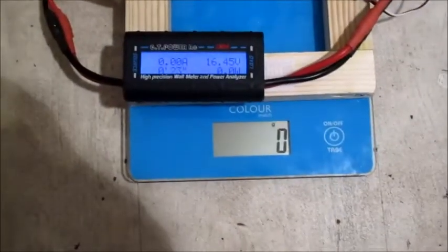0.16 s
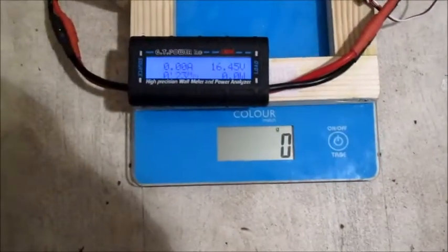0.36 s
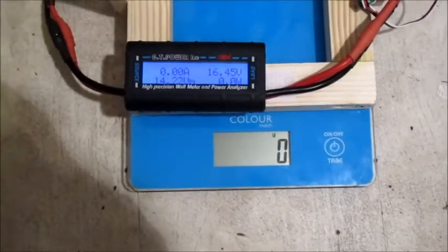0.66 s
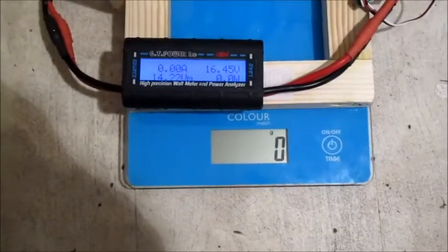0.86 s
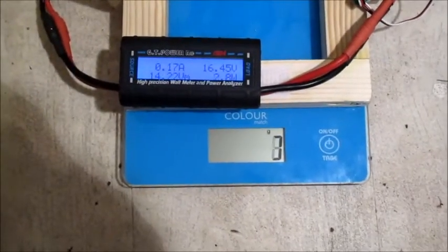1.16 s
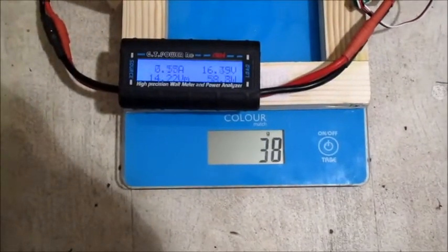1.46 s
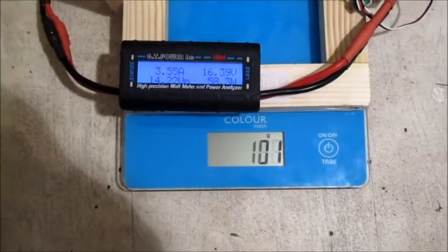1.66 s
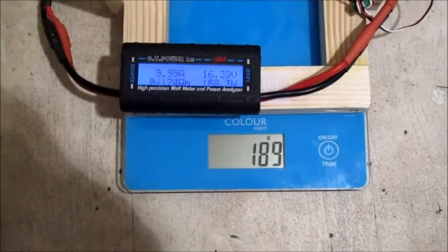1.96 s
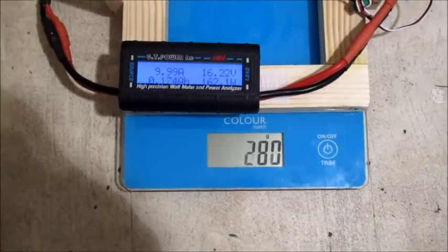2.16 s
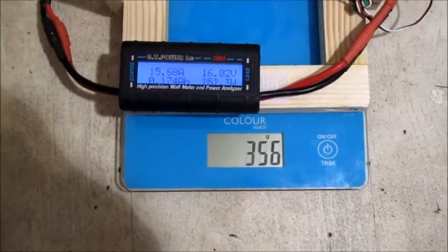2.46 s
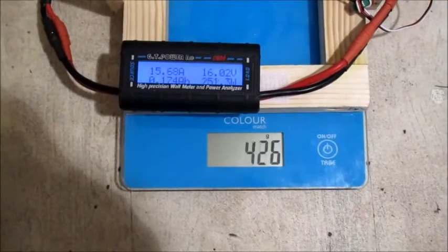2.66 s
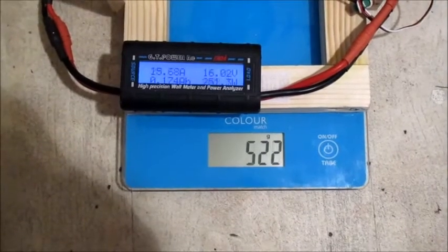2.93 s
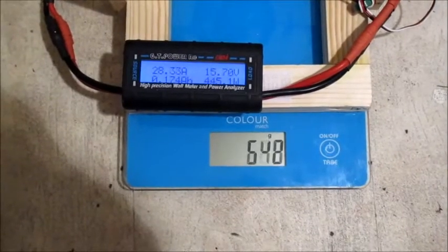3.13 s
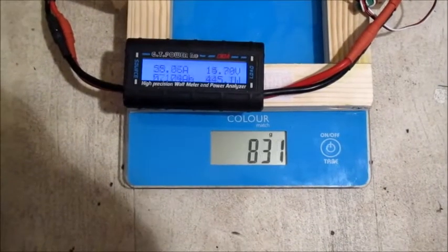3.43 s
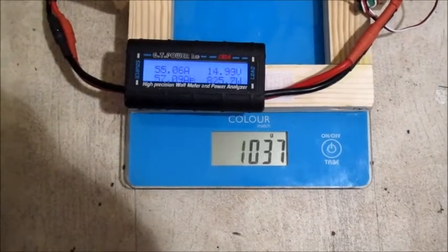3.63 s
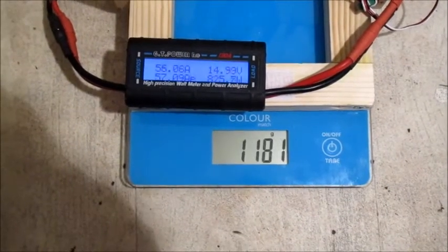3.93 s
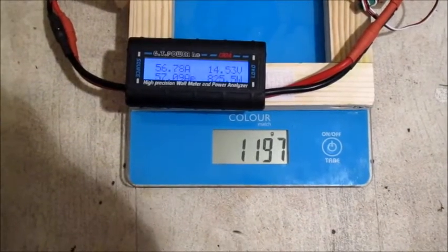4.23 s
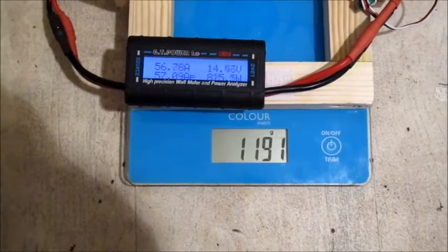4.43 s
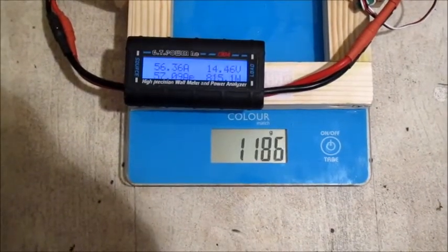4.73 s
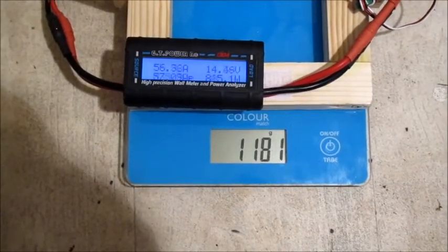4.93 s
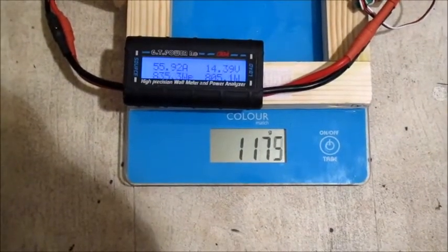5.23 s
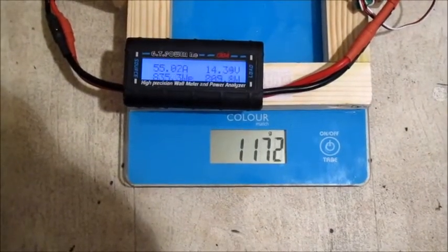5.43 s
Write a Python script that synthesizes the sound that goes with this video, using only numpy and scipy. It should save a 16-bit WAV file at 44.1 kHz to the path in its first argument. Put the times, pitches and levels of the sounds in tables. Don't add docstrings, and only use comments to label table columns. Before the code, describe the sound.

A small motor fan chirps into motion, climbs in pitch with strong hissing airflow, holds a piercing steady whine, and finally starts slowing.

```python
import sys
import numpy as np
from scipy import signal
from scipy.io import wavfile
from scipy.ndimage import uniform_filter1d

SR = 44100
rng = np.random.default_rng(int(sys.argv[2]) if len(sys.argv) > 2 else 0)


def materialize(psi):
    bounded = np.clip(np.atleast_2d(psi).T, -1, 1)
    quanta = np.round(bounded * 32767).astype(np.int16)
    wavfile.write(sys.argv[1], SR, quanta)


def attenuation_scalar(level_db):
    decades = np.asarray(level_db, float) / 20
    return 10 ** decades


N = 246519
T = np.arange(N) / SR
HZ = np.fft.rfftfreq(1024, 1 / SR)[:, None]
FRAMES = np.arange(N // 256 + 5) * 256 / SR


def evened(x):
    return x / np.sqrt(np.mean(x ** 2) + 1e-20)


def read(points, hz):
    f, value = np.transpose(points)
    return np.interp(np.log(hz + 1), np.log(f + 1), value)


def drift(fastest_hz):
    waves = 0
    for f in np.geomspace(.5, fastest_hz, 16):
        waves = waves + np.sin(2 * np.pi * (f * T + rng.random())) / np.sqrt(f)
    return evened(waves)


def noise(colour_db, patchy_db):
    real, imaginary, patches = rng.standard_normal((len(FRAMES), 513, 3)).T
    patches = uniform_filter1d(patches, 10, 0)
    patches = evened(uniform_filter1d(patches, 10, 1))
    gain = attenuation_scalar(colour_db + 0 * patches)
    gain = gain / np.sqrt((gain ** 2).mean(0))
    spectra = (real + 1j * imaginary) * gain * attenuation_scalar(patchy_db * patches)
    return evened(signal.istft(spectra, nperseg=1024, noverlap=768)[1][:N])


def echoes(hz, depth, longest_s):
    delay, turn = rng.random((12, 2)).T
    grid = np.arange(0, SR / 2, 2.)
    comb = np.exp(2j * np.pi * (grid[:, None] * delay * longest_s + turn)).sum(1) / np.sqrt(12)
    return (1 + depth * np.interp(hz, grid, comb, right=0)) / np.sqrt(1 + depth ** 2)


def tone(rows):
    s, hz, db = np.transpose(rows)
    level_db = np.interp(T, s, db, left=-200, right=-200)
    turns = np.cumsum(np.interp(T, s, hz)) / SR
    return np.sqrt(2) * attenuation_scalar(level_db) * np.sin(2 * np.pi * turns)


# time in seconds, shaft speed in Hz, then levels in dB
FAN_RUN = [
    [(0.9, 139.9, -55, -55, -61, -44), (0.924, 159.7, -55, -62, -38, -43),
     (0.978, 193.7, -33.5, -36, -30, -46), (1.126, 253.4, -28, -45, -24, -36),
     (1.168, 259.7, -26, -54, -40, -49), (1.196, 272.8, -27, -38, -27, -38),
     (1.286, 306.2, -27.5, -41, -24, -27), (1.316, 320.6, -28, -45, -23.5, -48),
     (1.368, 343.7, -24.5, -31, -22, -34), (1.416, 366.1, -33, -43, -23.5, -27),
     (1.508, 419.7, -27.5, -29, -17.5, -32), (1.566, 430.5, -30, -33, -42, -18.5),
     (1.668, 448.4, -34, -21.5, -25.5, -25), (1.77, 489.1, -28, -51, -17.5, -28),
     (1.816, 502.9, -25, -36, -16.5, -34), (2.0, 526.7, -27.5, -44, -15, -38)],
    [(2.01, 530.9, -28, -39, -19.5, -37), (2.082, 544.8, -21, -47, -14, -30),
     (2.204, 570.2, -25, -25, -23, -33), (2.24, 582.4, -26, -28, -10.5, -27),
     (2.27, 587.9, -21.5, -26, -28, -39), (2.354, 612.6, -34.5, -32.5, -13, -27),
     (2.554, 656.7, -37, -42, -6, -46), (2.642, 685.1, -29, -29, -19.5, -37),
     (2.766, 735.4, -20.5, -31, -11, -29), (2.81, 751.6, -21, -45, -25, -44),
     (2.826, 762.5, -15, -31, -17.5, -30), (3.086, 857.6, -14.5, -24, -12, -30),
     (3.112, 864.3, -13.5, -32, -30, -27), (3.134, 875.2, -20, -48, -14, -29),
     (3.152, 884.2, -28, -26, -14, -26), (3.222, 911.7, -19.5, -39, -14, -17),
     (3.284, 934.0, -16.5, -27.5, -11.5, -25), (3.33, 940.2, -15, -35, -18, -18)],
    [(3.34, 939.9, -16.5, -33, -19, -20), (3.372, 939.7, -16, -33, -17, -26),
     (3.38, 939.6, -16.5, -32, -18, -21), (3.538, 938.6, -15.5, -32, -18, -21.5),
     (3.556, 938.5, -16, -40, -21, -21), (3.588, 938.2, -15.5, -33, -16, -21),
     (3.616, 938.2, -16, -34, -15, -18), (3.742, 935.7, -17, -31, -17, -20.5),
     (3.782, 937.7, -17.5, -28, -13, -23), (3.796, 935.6, -17, -37, -13, -17.5),
     (3.844, 934.9, -16.5, -30.5, -13, -20.5), (4.004, 935.3, -15, -32, -12, -21.5),
     (4.084, 933.0, -16, -28, -12, -25), (4.112, 933.0, -17, -34, -12, -23),
     (4.126, 932.9, -15.5, -27.5, -12, -22), (4.402, 931.1, -17, -28, -16, -26),
     (4.412, 931.1, -17, -27, -19, -31), (4.454, 930.6, -15.5, -25.5, -10.5, -26),
     (4.508, 931.1, -17.5, -26, -16, -29), (4.63, 929.7, -14.5, -27, -16, -26),
     (4.74, 928.9, -17, -27, -9.5, -24), (5.0, 927.2, -16.5, -27.5, -15.5, -25.5)],
    [(5.3, 929.3, -16.5, -26, -12.5, -35), (5.446, 928.2, -18, -25.5, -12, -28),
     (5.478, 921.1, -18, -28, -15.5, -21), (5.52, 890.1, -28, -41, -16.5, -25),
     (5.546, 866.4, -20.5, -36, -21, -33), (5.558, 850.1, -13, -23, -13, -26),
     (5.59, 814.6, -18, -30, -17, -30)],
]


def strong_tones(speed, turns, levels_db, sweeping):
    out = np.zeros(N)
    for k, db, depth in zip((1, 2, 5, 7), levels_db, (.1, .3, .35, .4)):
        wave = echoes(k * speed, depth * sweeping, .04) * np.exp(2j * np.pi * k * turns)
        out += (attenuation_scalar(db + 0.34 * drift(25.)) * wave).real
    return out


WEAK_SPEEDS = [230, 400, 560, 720, 860, 927, 940]
# multiple of the shaft speed, then level in dB at each of WEAK_SPEEDS.
WEAK_TONES = [(3, -39, -38, -40, -31.5, -35, -29, -29.5), (4, -35, -35, -35, -31, -29, -30.5, -21.5),
              (6, -36, -32, -37, -31, -34, -31.5, -38), (8, -34, -24, -28, -37, -19, -34, -27),
              (9, -34, -30, -44, -30, -38, -40, -36), (10, -37, -24.5, -35, -34, -30, -29.5, -28.5),
              (11, -33, -36, -29, -31, -31, -26, -27.5), (12, -36, -43, -44, -48, -46, -40, -35),
              (13, -42, -34, -48, -46, -43, -49, -49), (14, -46, -46, -47, -48, -47, -48, -43),
              (15, -44, -37, -28, -32, -43, -44, -44), (16, -46, -44, -50, -50, -52, -52, -56),
              (18, -49, -48, -52, -55, -60, -70, -70)]


def weak_tones(speed, turns, sweeping):
    hiss_s, hiss_db = np.transpose(np.concatenate(AIR_LEVELS))[:2]
    duck_db = np.interp(T, hiss_s, hiss_db) + 19
    out = np.zeros(N)
    for k, *levels in WEAK_TONES:
        db = np.interp(speed, WEAK_SPEEDS, levels) + duck_db + 1.1 * drift(18.0)
        wave = echoes(k * speed, .9 * sweeping, .02) * np.exp(2j * np.pi * (k * turns + rng.random()))
        out += (attenuation_scalar(db) * wave).real
    return out


# shaft multiple, start and end in seconds, level in dB.
SWITCHING_TONES = [
    (3, 0.81, 1.5, -42),
    (4, .88, 1.45, -52),
    (5, .92, 1.1, -54),
    (2, 1.1, 1.65, -50),
]


def switching_tones(turns):
    out = np.zeros(N)
    for k, start, stop, db in SWITCHING_TONES:
        gate = np.clip(np.minimum(T - start, stop - T) / .015, 0, 1)
        out += gate * attenuation_scalar(db + 2.5 * drift(15.)) * np.cos(2 * np.pi * (16000 * T - k * turns))
    return out


def rotor():
    s, *columns = np.transpose(np.concatenate(FAN_RUN))
    speed, *levels_db = (np.interp(T, s, c, left=.8 * c[0]) for c in columns)
    turns = np.cumsum(speed * (1 + 0.00031 * drift(30.4))) / SR
    sweeping = np.clip((918 - speed) / 30, .12, 1)
    out = strong_tones(speed, turns, levels_db, sweeping) + weak_tones(speed, turns, sweeping)
    out *= np.clip((T - s[0]) / .03, 0, 1)
    return np.sqrt(2) * (out + switching_tones(turns))


# pitch in Hz, width in Hz, lift in dB.
DUCT_RESONANCES = [(3204, 310, 10.5), (4030, 410, 1.5), (6830, 410, 1), (8380, 400, 4), (10700, 460, -0.5)]


def duct_db(hz):
    return sum(db / (1 + (2 * (hz - f) / width) ** 2) for f, width, db in DUCT_RESONANCES)


# time in seconds, then levels in dB of hiss, midrange rush, buffeting.
AIR_LEVELS = [
    [(0.8, -76, -54, -56), (0.83, -60, -50, -55), (0.902, -32.5, -47, -50), (1.004, -18.5, -21, -30),
     (1.066, -19.5, -15, -38), (1.1, -18, -24, -32)],
    [(1.12, -17.5, -23, -31), (1.21, -15.5, -20, -35), (1.26, -16, -20, -29), (1.33, -16.5, -19, -35),
     (1.44, -17, -20.5, -31.5), (1.83, -18.5, -22.5, -29.5), (1.92, -19, -23, -29.5), (1.95, -20, -23, -31),
     (2.12, -19, -22, -26.5), (2.19, -19, -23.5, -32), (2.26, -18, -20, -27.5), (2.34, -19.5, -24.5, -32),
     (2.55, -23, -23.5, -35), (2.61, -20.5, -25, -30.5), (2.87, -18.5, -22.5, -27.5),
     (2.96, -20.5, -20, -31), (3.05, -19, -21, -26.5), (3.07, -20.5, -20, -26.5), (3.19, -19, -19.5, -22),
     (3.24, -18.5, -16.5, -29), (3.27, -19.5, -18, -27.5), (3.34, -18.5, -20.5, -23),
     (3.45, -18.5, -17.5, -28.5), (3.65, -18.5, -19.5, -22.5), (3.7, -20, -18, -31),
     (3.81, -20, -18.5, -25.5), (3.85, -19.5, -18, -29), (4.22, -19, -18.5, -26.5), (4.24, -19, -22, -25),
     (4.28, -20, -20.5, -27), (4.44, -19, -18, -28), (4.47, -18, -19, -32), (4.54, -19, -19.5, -24.5),
     (4.67, -19.5, -20, -28.5), (4.82, -19, -19.5, -26), (4.98, -19.5, -21.5, -28.5),
     (5.02, -19.5, -18.5, -25.5), (5.2, -20, -20, -29), (5.28, -20.5, -18, -26),
     (5.33, -19.5, -18.5, -26.5), (5.4, -19, -19, -33), (5.45, -19.5, -18, -23.5), (5.51, -20, -21, -27),
     (5.59, -20, -21, -26)],
]
# pitch in Hz, level in dB per Hz.
SLOW_HISS = [(1500, -24), (2500, -3.5), (4000, -6), (5000, -8), (6500, -2), (7800, -10), (10000, -8),
             (12000, -14), (15500, -23)]
FAST_HISS = [(1500, -26), (2500, -12), (4000, -3.5), (5000, -4.5), (6500, 0.5), (7800, -5.5), (10000, -6),
             (12000, -10.5), (15500, -18)]
RUSH_COLOUR = [(150, -8.5), (300, 0.5), (600, -2.5), (1000, -0.5), (1800, -1), (2600, 1), (4000, -10.5)]
# pitch in Hz, level in dB per Hz.
BUFFET_COLOUR = [(20, -42), (40, -21), (70, -0.5), (130, 2.5), (210, 1), (320, -11), (600, -42),
                 (1200, -45)]


def air():
    s, speed = np.transpose(np.concatenate(FAN_RUN))[:2]
    fast = np.clip(np.interp(FRAMES, s, speed) / 940, 0, 1)
    hiss_colour = (1 - fast) * read(SLOW_HISS, HZ) + fast * read(FAST_HISS, HZ)
    hiss = noise(hiss_colour + duct_db(HZ), 0.96)
    rush = noise(read(RUSH_COLOUR, HZ), 0.97)
    buffet = noise(read(BUFFET_COLOUR, HZ / fast ** 0.68), 0.61)
    at, *levels = np.transpose(np.concatenate(AIR_LEVELS))
    hiss_db, rush_db, buffet_db = (np.interp(T, at, c, left=-120) for c in levels)
    crackle = attenuation_scalar(0.95 * evened(uniform_filter1d(rng.standard_normal(N), 60)))
    out = attenuation_scalar(hiss_db + 0.5) * hiss * crackle
    out += attenuation_scalar(rush_db - 6.5) * rush
    return out + attenuation_scalar(buffet_db + 2.0) * buffet


# time in seconds, level in dB, rise in seconds,
# time to fall by 60 dB in seconds, share of the higher ring in dB.
MOTOR_KICKS = [
    (.808, -37, .001, .06, -10),
    (.817, -17.5, 0.00092, 0.053, -11),
    (0.832, -12.5, 0.0013, 0.06, -14),
    (.836, -8.5, .007, 0.082, -21),
    (0.869, -27, .004, 0.22, -4),
    (.903, -12.5, 0.0044, 0.091, -14),
    (.938, -25, 0.0072, .06, 9),
    (.955, -23, .004, .08, -10),
    (1.093, -7, .008, 0.063, -23),
]
# pitch in Hz, level in dB.
RATTLE_COLOUR = [(150, -20), (300, -3), (500, 0.5), (900, 2), (1900, -2.5), (3200, -9), (5000, -14),
                 (9000, -25), (13000, -30), (15000, -34)]
# time in seconds, pitch in Hz, level in dB.
POLE_CHIRP = [
    (.9, 1350, -30),
    (.91, 1440, -26),
    (.93, 1793, -29),
    (.945, 1955, -26),
    (.965, 2160, -38),
]
# time in seconds, pitch in Hz, level in dB.
STAND_BUZZ = [
    (2.56, 990, -58),
    (2.59, 997, -30),
    (2.64, 1012, -33),
    (2.67, 1018, -60),
]


def kicks():
    out, shake = np.zeros((2, N))
    for s, db, rise, t60, high_db in MOTOR_KICKS:
        age = np.maximum(T - s, 0)
        swell = attenuation_scalar(db - 60 * np.maximum(age - rise, 0) / t60) * np.minimum(age / rise, 1)
        low_ring = np.sin(2 * np.pi * 1400 * age)
        high_ring = np.sin(2 * np.pi * 1923 * age)
        out += swell * (low_ring + attenuation_scalar(high_db) * high_ring)
        shake += attenuation_scalar(db - 20 - 60 * age / 0.26) * np.minimum(age / 0.005, 1)
    rattle = shake * noise(read(RATTLE_COLOUR, HZ), 1.7)
    return out + rattle + tone(POLE_CHIRP) + tone(STAND_BUZZ)


# pitch in Hz, level in dB per Hz.
ROOM_COLOUR = [(12, -48), (20, -21), (70, -16), (122, -5), (186, -16), (267, -8.5), (353, -15), (885, -16),
               (2100, -24), (9450, -32.5), (15600, -45)]
# pitch in Hz, how far it wanders in Hz, level in dB.
DISTANT_HUMS = [(119, 2.5, -53), (266, 8.1, -63), (11795, 2, -83)]


def workshop():
    out = attenuation_scalar(-52.5) * noise(read(ROOM_COLOUR, HZ), 1.1)
    for hz, width, db in DISTANT_HUMS:
        level = np.sqrt(2) * attenuation_scalar(db + 1.3 * drift(9.8))
        out += level * np.sin(2 * np.pi * np.cumsum(hz + width * drift(10.0)) / SR)
    return out


def scene():
    mono = rotor() + air() + kicks() + workshop()
    return np.array([mono, mono])


SPLIT_EDGES = [4200, 5200, 6200, 7600, 9000, 10300, 11700, 13100, 14500, 15700]


def split_noise(x):
    hz, t, z = signal.stft(x, SR, nperseg=2048)
    side = np.zeros_like(z)
    chance = rng.random((len(t), len(SPLIT_EDGES) - 1)).T < .018
    for low, high, on in zip(SPLIT_EDGES, SPLIT_EDGES[1:], chance):
        band = (hz >= low) & (hz < high)
        side[band] = on * np.median(abs(z[band]), 0)
    turn = np.exp(2j * np.pi * rng.random(z.T.shape).T)
    return attenuation_scalar(2.5) * signal.istft(side * turn, SR, nperseg=2048)[1][:N]


def band_limit(x):
    return signal.sosfilt(signal.butter(12, 15750, fs=SR, output="sos"), x)


def record(dry):
    cut = signal.lfilter(*signal.butter(2, 24., "high", fs=SR), dry)
    limited = .95 * np.tanh(cut / 0.94)
    mix = limited + np.outer([1, -1], split_noise(limited[0]))
    return band_limit(mix)


dry = scene()
out = record(dry)
materialize(out)
```